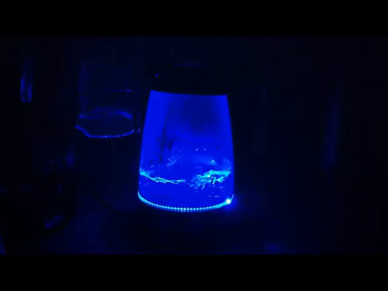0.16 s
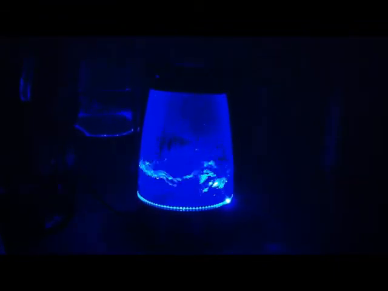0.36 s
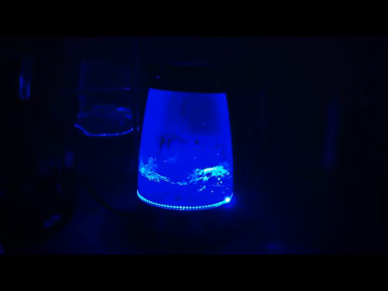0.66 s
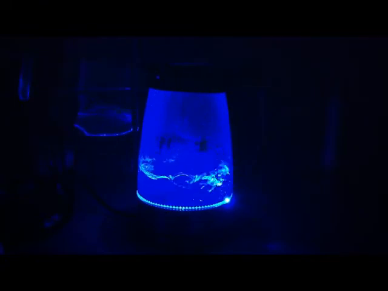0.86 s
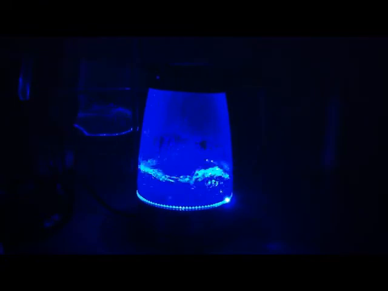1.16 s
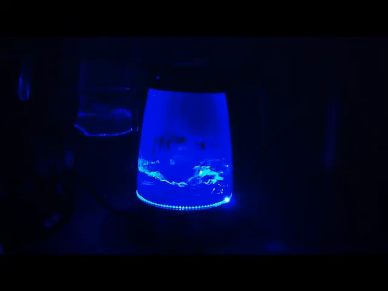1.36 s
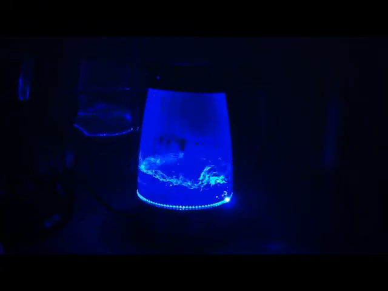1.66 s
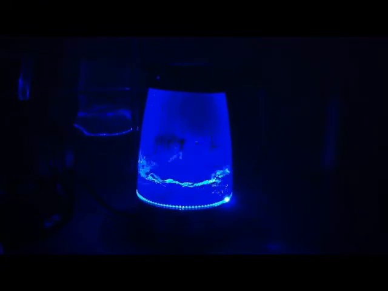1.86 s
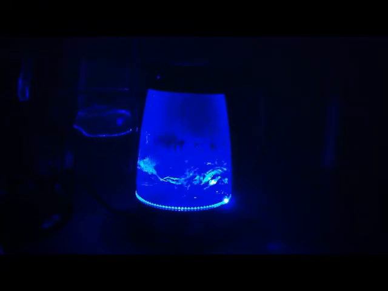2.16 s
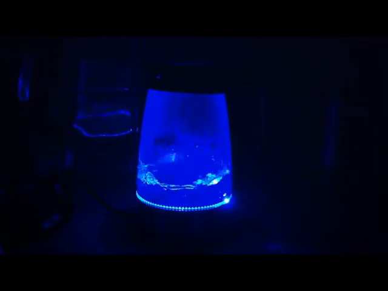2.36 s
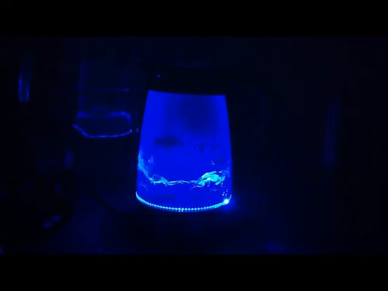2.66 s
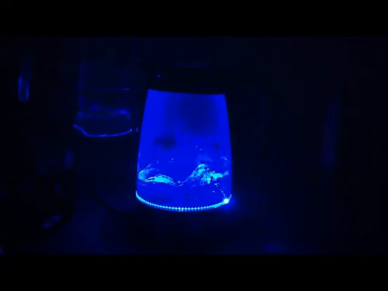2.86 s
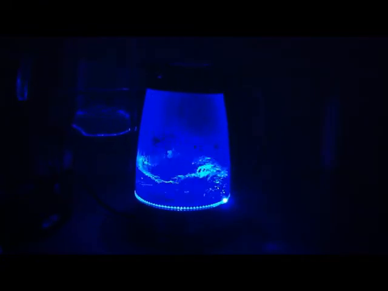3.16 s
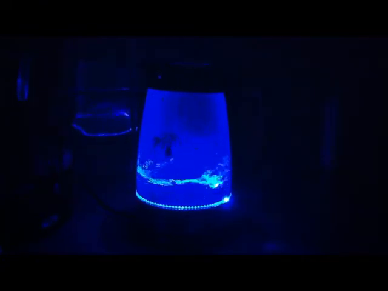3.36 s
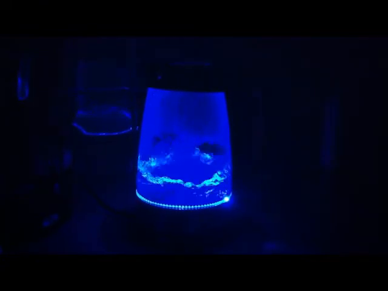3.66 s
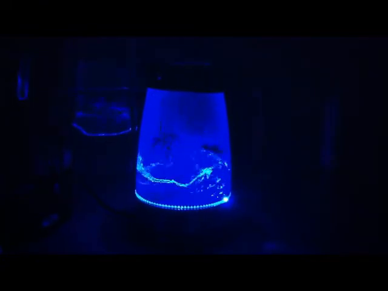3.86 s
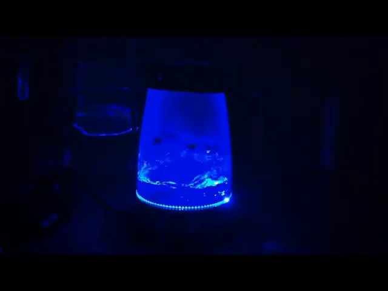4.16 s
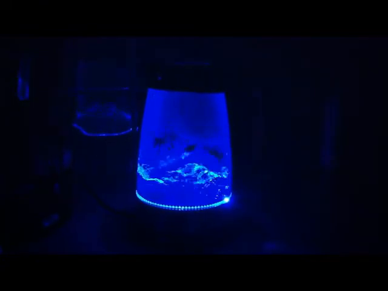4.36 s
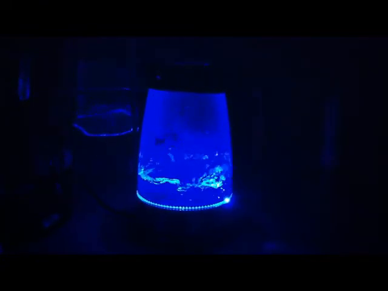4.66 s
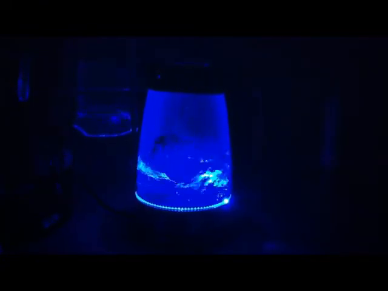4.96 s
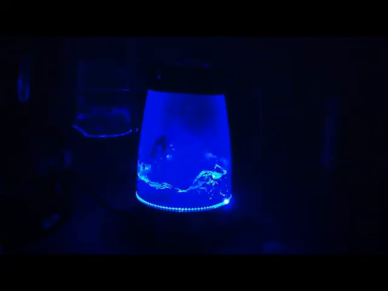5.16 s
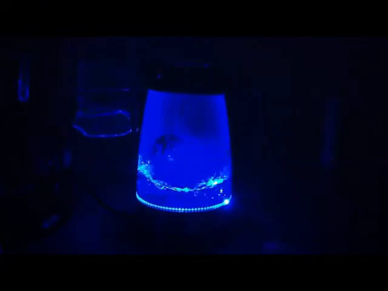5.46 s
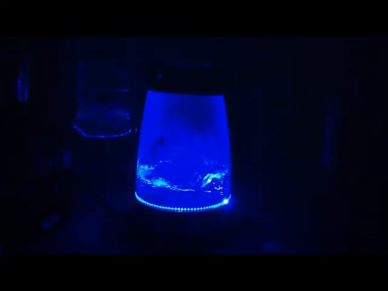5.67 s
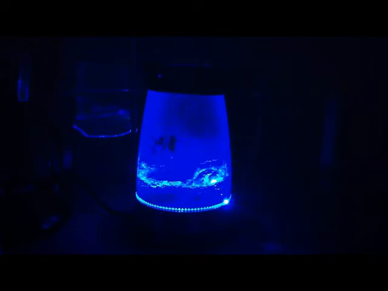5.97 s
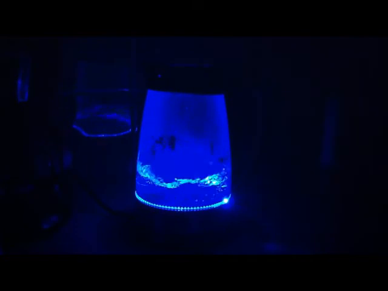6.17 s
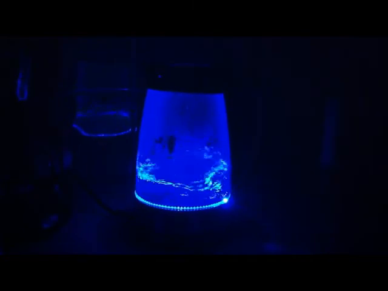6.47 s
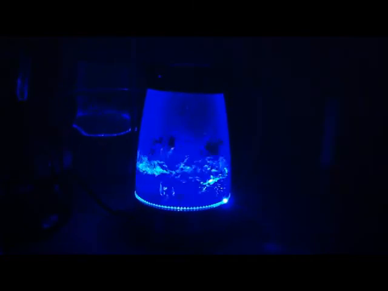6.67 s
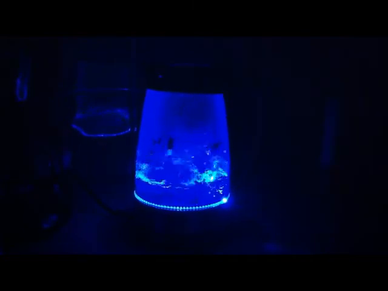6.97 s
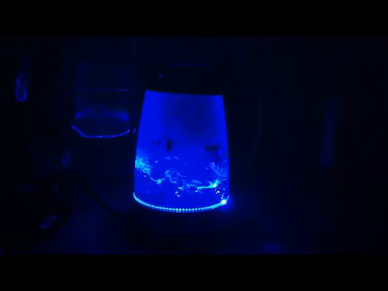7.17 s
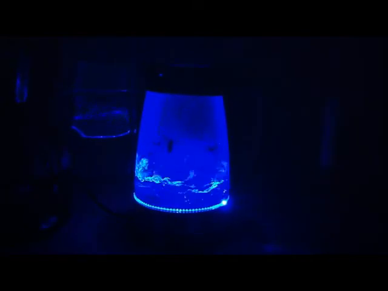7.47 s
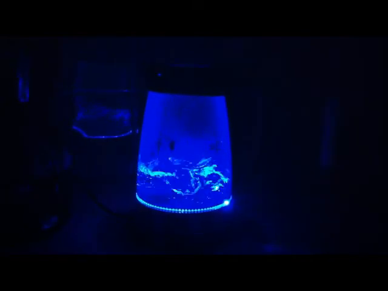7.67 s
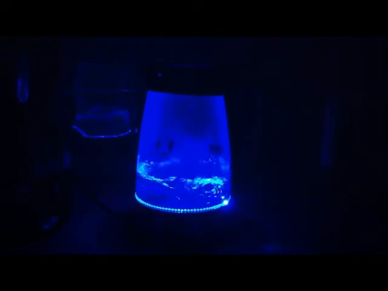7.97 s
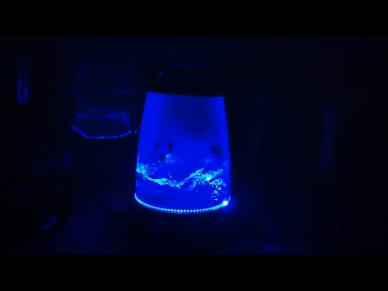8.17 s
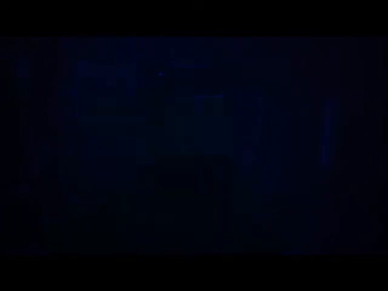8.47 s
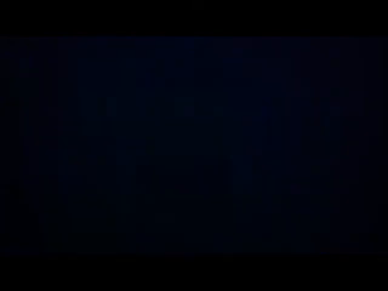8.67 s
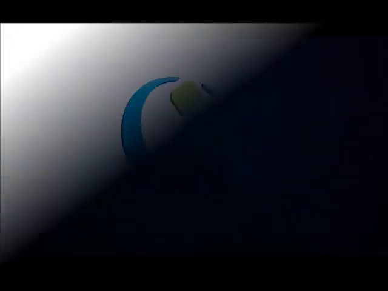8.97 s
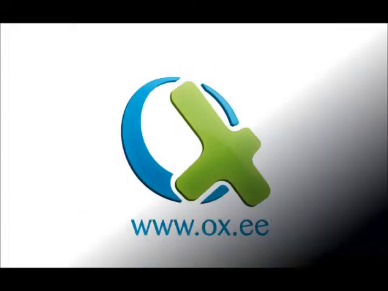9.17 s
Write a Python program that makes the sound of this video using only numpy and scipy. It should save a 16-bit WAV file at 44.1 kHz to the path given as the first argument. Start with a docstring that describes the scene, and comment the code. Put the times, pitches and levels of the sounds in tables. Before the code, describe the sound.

A glass electric kettle is already at a rolling boil, heard close with one microphone in a small hard kitchen with a short room tail. From 0 s a low drone around 200 Hz thumps and wavers in the base, swelling and dropping out irregularly. Above it runs a dense, wet gurgle with hollow ringing from the air over the water, and a light bright hiss of spray. Short rounded bubble plops, many around one pitch, and noisy little splats on the glass poke out at random, growing busier from about 2.5 to 5 s. From roughly 4.7 s the whole scene fades steadily, though the boiling stays lively. At about 8.5 s the switch lets go: a sharp, hard plastic snap with quick bounces and a brief hollow rattle, clearly louder than the faded water. Faint bubbling lingers and sinks to near silence by 9.3 s.

```python
"""A low drone of steam thumping the base of a glass electric kettle, then gurgle and hiss above it.
Place: a small hard kitchen; distance: close to the jug; one microphone.
Random clicks ring the base and the air above the water; glides and noise make bubbles and spray.
Single drops and bubbles stand out; the switch snaps off as bursts of noise and decaying tones,
late in a long fade-out. Sparse decaying taps give the room."""
import sys
import numpy as np
from scipy import signal
from scipy.fft import rfft, irfft, next_fast_len
from scipy.io import wavfile
from scipy.ndimage import uniform_filter1d

SR = 44100
rng = np.random.default_rng(int(sys.argv[2]) if len(sys.argv) > 2 else 0)


def store_pcm(level_fs):
    """Save levels as 16-bit WAV."""
    pcm = np.round(np.clip(level_fs, -1, 1) * 32767).astype(np.int16)
    wavfile.write(sys.argv[1], SR, np.atleast_2d(pcm).T)


N = 411453


def gain_of(db):
    """Decibels to an amplitude factor."""
    return 10 ** (np.asarray(db) / 20)


def evened(x):
    """Scales to rms 1."""
    return x / np.sqrt(np.mean(x ** 2) + 1e-20)


def read(points, hz):
    """Looks up a table on a log-frequency axis."""
    f, value = np.transpose(points)
    return np.interp(np.log(hz + 1), np.log(f + 1), value)


def level_over_time(points):
    """Joins (time [s], level [dB]) points by straight lines, one dB value per sample."""
    return np.interp(np.arange(N) / SR, *np.transpose(points))


def add(mix, s, sound):
    """Mixes a sound in at s seconds."""
    part = mix[round(s * SR):][:len(sound)]
    part += sound[:len(part)]


def coloured(x, points):
    """Filters x by a table of (frequency [Hz], gain [dB])."""
    n = next_fast_len(len(x), True)
    gain = gain_of(read(points, np.fft.rfftfreq(n, 1 / SR)))
    return irfft(rfft(x, n) * gain, n)[:len(x)]


def resonate(x, modes):
    """Sum of resonances, neighbours in opposite phase."""
    out = 0
    for k, (hz, width, db) in enumerate(modes):
        out = out + (-1) ** k * gain_of(db) * signal.lfilter(*signal.iirpeak(hz, hz / width, SR), x)
    return out


def scattered(per_s, spread_db):
    """Random clicks of either sign, most small, a few large."""
    place, size, sign = rng.random((8000, 3))[:int(per_s * N / SR)].T
    out = np.zeros(N)
    size_db = spread_db * np.minimum(-np.log(size), 3.5)
    out[(place * N).astype(int)] = gain_of(size_db) * np.sign(sign - .5)
    return out


def surging(per_s, depth_db):
    """Random level that wanders about per_s times a second."""
    knots = rng.standard_normal(1000)
    return gain_of(depth_db * np.interp(np.arange(N) / SR * per_s, np.arange(1000), knots))


def bubble(hz, cycles, glide):
    """A short tone that swells, glides in pitch and dies, as a bubble closes."""
    u = np.arange(0, 1, hz / (2 * cycles * SR))  # share of its life
    phase = 2 * np.pi * 2 * cycles * (u + glide * (u ** 2 - u) / 2)
    return np.sin(phase) * 5 * u * np.exp(1 - 5 * u) * (1 - u)


# strongest mode of the base: (frequency [Hz], width [Hz], level [dB])
HUM_MODE = [(201.7, 16.2, 0)]
# weaker modes of jug, base and counter: (frequency [Hz], width [Hz], level [dB])
BASE_MODES = [(120.2, 24, -12.5), (158.5, 15.4, -1), (246.2, 12.4, -7), (274.9, 13.8, -4),
              (293.4, 19.3, -4)]


def thumping(modes, evenness):
    """Steam pockets collapse on the plate in quick succession and ring the base."""
    rung = resonate(scattered(per_s=600, spread_db=2.5), modes)
    if len(modes) == 1:  # a lone mode has steep skirts
        hz, width, _ = modes[0]
        rung = resonate(rung, [(hz, 2.1 * width, 0)])
    rung = signal.sosfilt(signal.butter(6, [112, 308], "band", fs=SR, output="sos"), rung)
    power = abs(uniform_filter1d(rung ** 2, size=SR // 15))
    # the drone stays near its running mean level
    return evened(rung / (power + 0.051 * power.mean()) ** (evenness / 2))


# swells and drop-outs of the base hum: (time [s], level [dB] added to the thumping)
HUM_SWELLS = [(0.07, 4), (0.19, 3), (0.27, -7), (0.45, 4.5), (0.61, -2), (1.03, 1.5), (1.34, 4), (1.5, 7),
              (1.68, 3.5), (1.95, 4), (2.21, 0), (2.27, 4.5), (2.56, 6), (2.76, 9), (2.85, -18), (3.02, 4),
              (3.1, 9), (3.43, 2.5), (3.86, 12.5), (3.99, -7), (4.08, 7), (4.21, 3.5), (4.78, 2), (4.85, 6),
              (4.94, 5.5), (5.08, 7.5), (5.42, -1), (5.52, 8.5), (5.73, 6.5), (6.08, 9.5), (6.19, 8),
              (6.4, 10.5), (6.74, 9), (6.81, -7), (6.96, -5), (7.03, -1), (7.32, 8), (7.41, 11.5),
              (7.48, -14), (7.63, -1), (7.71, 4), (7.82, 4.5), (7.93, 3), (8.12, 3), (8.41, 9.5),
              (8.49, 10), (8.62, -3), (8.71, -4), (8.9, 1), (8.96, 7.5), (9.27, -7)]
# thumping at the heating plate, easing off late in the boil: (time [s], level [dB])
THUMP_LEVEL = [(0.0, -43), (1.0, -45.5), (4.0, -45.5), (6.5, -47.5), (7.2, -47.5), (8.7, -48.5),
               (9.33, -46.5)]
SWELL_S = 0.028  # time from the centre of a swell to 1/e of its dB


def swelling(share):
    """Level of the thumping, with a share of the short bell-shaped swells and drop-outs, in dB."""
    t = np.arange(0, N, 100) / SR  # coarse grid, interpolated below
    swell_db = sum(db * np.exp(-((t - s) / SWELL_S) ** 2) for s, db in HUM_SWELLS)
    level_db = share * swell_db + np.interp(t, *np.transpose(THUMP_LEVEL))
    return gain_of(np.interp(np.arange(N) / SR, t, level_db))


# wash of small bubbles: (frequency [Hz], colour [dB per Hz])
GURGLE_COLOUR = [(250, -65), (340, -3), (480, -6), (650, -8), (900, -12), (1350, -10), (2400, -15.5),
                 (3000, -22), (4500, -26), (8000, -40)]
GURGLE_DB = -53  # steady level of the rolling boil


def gurgle(surge):
    """Dense bubbles of every size over a wash of smaller ones."""
    bubbles = np.zeros(N)
    for hz in np.geomspace(320, 4000, num=20):
        bubbles += signal.oaconvolve(scattered(per_s=48, spread_db=3.5), bubble(hz, 11.9, 0.21))[:N]
    bubbles = evened(coloured(bubbles, [(300, -13.0), (4000, 4.5)]))
    water = (rng.standard_normal(N) + gain_of(-9.5) * bubbles) * surge
    return evened(coloured(water, GURGLE_COLOUR))


# bursting films and drops: (frequency [Hz], colour [dB per Hz])
SPRAY_COLOUR = [(1200, -22), (2500, -8.5), (4300, -13.5), (5400, -4), (7400, -6.5), (8400, -7.5),
                (10300, -11), (13800, -7), (15700, -8.5)]
# glass wall under the spray: (frequency [Hz], width [Hz], level [dB over the spray])
GLASS_WALL = [(5200, 200, -0.5)]


def spray(surge):
    """Hiss of bursting films, with small drops landing in short noisy ticks, some dull and some bright."""
    t = np.arange(1500) / SR
    drops = rng.standard_normal(N)
    for colour in ([(6000, -1), (11000, -11)], [(6000, -8), (11000, -2)]):  # dull, then bright
        ticks = signal.oaconvolve(abs(scattered(per_s=50, spread_db=1.8)), gain_of(-60 * t / .03))[:N]
        drops = drops + gain_of(-2.0) * coloured(rng.standard_normal(N) * evened(ticks), colour)
    drops = coloured(surge * drops, SPRAY_COLOUR)
    glass = surging(per_s=12, depth_db=3.5) * resonate(drops, GLASS_WALL)
    return evened(drops + glass)


# the spray grows as the boil gets wilder: (time [s], level [dB])
SPRAY_LEVEL = [(0.0, -63), (1.3, -62), (2.5, -62), (4.3, -60), (5.5, -61.5), (7.0, -60), (8.0, -59.5),
               (9.33, -59)]


def spray_growth():
    """Level of the spray along the boil."""
    return gain_of(level_over_time(SPRAY_LEVEL))


# air above the water: (frequency [Hz], width of the first pass [Hz], level [dB over the slosh])
AIR_MODES = [(429.4, 23, -2.5), (570.5, 14, -10.5), (624.6, 39, -5), (805.6, 19, -10), (1044, 52, -4),
             (1125, 32, -6), (1635, 48, -4), (2087, 300, -5), (2170, 110, -8)]
SLOSH_DB = -61.5  # steady level that the air modes are set against


def cavity():
    """Small slaps knock each air mode in turn, over a flickering noisy slosh; two passes keep it narrow."""
    out = np.zeros(N)
    for hz, width, db in AIR_MODES:
        slaps = evened(scattered(per_s=60, spread_db=4.5))
        drive = rng.standard_normal(N) + gain_of(-3.5) * slaps
        once = resonate(surging(per_s=36, depth_db=3.5) * drive, [(hz, width, 0)])
        out += gain_of(db) * evened(resonate(once, [(hz, 2 * width, 0)]))
    return out


def chirrups():
    """Small bubbles whose tone falls near the strong air modes stand out as short blips."""
    out = np.zeros(N)
    for hz in [1049, 1122, 1326, 1623, 1664, 1720, 2060, 2200]:
        blip = bubble(hz, 12.6, 0.094 * rng.standard_normal())
        out += signal.oaconvolve(scattered(per_s=14.0, spread_db=1.0), blip)[:N]
    return evened(out)


def low_rumble():
    """Faint low noise of wandering level, strongest near 96 Hz."""
    colour = [(20, -33), (60, -19.0), (76, -26), (96, -2), (125, -50)]
    noise = evened(coloured(rng.standard_normal(N), colour))
    return gain_of(-75.0) * surging(per_s=3.66, depth_db=3.5) * noise


# decay of the small hard kitchen: (frequency [Hz], time to fall 60 dB [s])
KITCHEN_DECAY = [(200, 1), (700, 0.36), (1500, 0.46), (3000, 0.45), (6000, 0.27), (14000, 0.22)]


def kitchen(x):
    """Room reflections as sparse taps of random sign, each band dying at its own speed."""
    taps = np.zeros(SR)
    at = np.arange(300, SR - 20, 20)
    taps[at + rng.integers(0, 20, len(at))] = rng.choice([-1., 1.], len(at))
    hz, t, z = signal.stft(taps, SR, nperseg=256)
    decay = gain_of(-60 * t / read(KITCHEN_DECAY, hz)[:, None])
    tail = signal.istft(z * decay, SR, nperseg=256)[1]
    return signal.fftconvolve(x, tail / np.linalg.norm(tail))[:N]


# drops thrown against the glass, before the fade: (time [s], level [dB], tilt [dB per octave])
GLASS_DROPS = [(0.167, -38, -9), (0.221, -59, -5), (0.297, -35.5, -4.5), (0.477, -38, -7),
               (0.6867, -33.5, -5), (0.832, -39, 1), (0.9383, -41, -7), (0.9638, -38, -1),
               (1.186, -37.5, -5), (1.7444, -38, 8), (2.3084, -38.5, -7), (2.5905, -39, -2),
               (2.772, -36, -12), (2.85, -34, -7), (2.8886, -32.5, 0.0), (3.0706, -35.5, -4),
               (3.4494, -35.5, -4), (3.5154, -42, -2), (3.618, -33.5, -7.5), (3.7219, -37.5, -3),
               (3.8664, -35, -4), (3.9325, -34, -12), (3.993, -41, -1), (4.024, -36, -1), (4.088, -35, -12),
               (4.15, -32, -4), (4.3233, -31, -4), (4.428, -38, -5), (4.537, -35, -4), (4.7375, -37, 4),
               (4.786, -32.5, -6), (4.8663, -37, 2), (5.03, -35.5, 0), (5.0789, -38, 9), (5.206, -37, -4),
               (5.541, -35, 5), (5.7748, -39, 4), (5.9852, -33, -4), (6.4854, -34.5, -6), (6.5525, -40, 10),
               (6.575, -35.5, -3), (6.6274, -36, 2), (6.9194, -34, -6.5), (7.663, -38.5, 2),
               (7.862, -32.5, -4), (7.904, -37, -2), (7.917, -35, -4), (7.961, -34.5, -3.5),
               (8.017, -36, -2), (8.08, -36, -8), (8.13, -36, -5), (8.319, -33.5, -8), (8.399, -35, -8),
               (8.757, -29.5, -9), (8.9965, -37, 4)]


def splats():
    """Each drop is a burst of noise with the colour of the spray, tilted about 6 kHz."""
    out, t, hz = np.zeros(N), np.arange(2048) / SR, np.array([1000, 16000])
    envelope = gain_of(-60 * t / 0.021) * (1 - np.exp(-t / 0.0057))
    noises = rng.standard_normal((len(GLASS_DROPS), 2048))
    for (s, db, tilt_db), noise in zip(GLASS_DROPS, noises):
        tilt = np.c_[hz, tilt_db * np.log2(hz / 6000)]
        noise = evened(coloured(coloured(noise, SPRAY_COLOUR), tilt))
        add(out, s - .001, gain_of(db) * envelope * noise)
    return out


# large bubbles closing, before the fade:
# (time [s], level [dB], frequency [Hz], length [cycles], slap level [dB over the tone])
LARGE_BUBBLES = [(0.209, -47, 1080, 9.2, -17), (0.250, -54, 2100, 12, -10), (0.263, -49, 1080, 8.5, -14),
                 (0.366, -46, 1610, 14, -17), (0.5026, -39.5, 1590, 9.1, -19), (0.5317, -46, 1640, 13, -16),
                 (0.5507, -46, 1580, 12, -12), (0.702, -46, 1630, 13, -10), (0.734, -48, 1080, 10, -16),
                 (0.837, -41, 1640, 23, -16), (1.086, -45, 1590, 13, -10), (1.199, -46, 1630, 14, -2),
                 (1.2995, -44.5, 1590, 35, -18), (1.324, -43.5, 1604, 19, -14), (1.341, -44, 1610, 11, -3),
                 (1.419, -45, 1634, 20, -20), (1.4576, -44.5, 1600, 12, 10), (1.465, -50, 2280, 14, 6),
                 (1.563, -34, 1620, 10.4, -6), (1.754, -48, 2100, 12, -12), (1.998, -54, 1080, 10, -14),
                 (2.004, -45, 1630, 16, -18), (2.0393, -48, 1020, 9.3, -13), (2.0834, -51, 2980, 12, -13),
                 (2.106, -45.5, 1690, 15, 5), (2.353, -45.5, 1650, 28, -19), (2.452, -57, 1310, 10, -14),
                 (2.599, -37.5, 1634, 13, -4), (2.634, -44, 1615, 18, -14), (2.645, -44, 1075, 15, -14),
                 (2.865, -46, 1080, 12, -14), (2.896, -42, 1630, 24, -5), (2.9063, -44, 1630, 20, -1),
                 (2.985, -48, 1600, 18, -16), (2.9067, -47, 3000, 20, 8), (3.106, -47, 1620, 16, -19),
                 (3.127, -48, 1070, 11, 8), (3.129, -48, 1620, 12, -14), (3.3278, -44, 1570, 17, -7),
                 (3.342, -52.5, 2980, 19, 12), (3.634, -46, 1630, 24, -12), (3.642, -46, 2590, 12, -4),
                 (3.6593, -42, 1664, 26, -12), (3.679, -47, 1670, 24, -16), (3.714, -45.5, 1644, 20, -12),
                 (3.8389, -45, 1660, 10.0, 5), (3.8686, -42.5, 2060, 14, -2), (4.279, -42.5, 1664, 15, -7),
                 (4.3241, -44.5, 2160, 16, -14), (4.631, -48.5, 2590, 12, 6), (4.663, -45, 2100, 14, -12),
                 (4.708, -47, 1070, 11, -14), (4.7901, -45, 1610, 17, 5), (4.802, -36, 2050, 11, 0),
                 (4.803, -46, 3020, 12, -9), (4.819, -35.5, 1620, 11, -3.5), (5.0311, -43, 1080, 6.5, -4),
                 (5.032, -43, 1750, 7.2, -8), (5.074, -51, 1670, 12, -15), (5.086, -40, 1660, 14, -2),
                 (5.154, -40.5, 1590, 7.5, -6), (5.211, -39.5, 1640, 14, -7), (5.511, -41.5, 1620, 17, -22),
                 (5.569, -36, 1650, 13, -3.5), (5.7129, -46, 2200, 13, 5), (5.878, -47, 1660, 17, -10),
                 (5.966, -43, 1610, 13, -10), (6.0338, -40, 1670, 16, -16), (6.084, -39, 1630, 10, 1.5),
                 (6.349, -41.5, 1685, 14, 2), (6.558, -44, 1664, 16, -20), (6.697, -46, 1080, 9.3, -14),
                 (6.74, -38, 1650, 8.9, -10), (6.874, -40.5, 1620, 13, -5), (6.94, -41.5, 1640, 18, -18),
                 (6.982, -46, 1670, 18, -14), (7.079, -37, 1660, 13, -15), (7.222, -45, 1350, 10, -12),
                 (7.2458, -41.5, 1634, 15, 0), (7.341, -45, 1620, 19, -14), (7.372, -43, 1630, 12, -14),
                 (7.599, -44, 1640, 13, -14), (7.604, -47, 1070, 10, -14), (7.756, -48, 1640, 14, -16),
                 (8.022, -40.5, 1630, 12, -9), (8.169, -44, 1680, 13, -16), (8.709, -46, 1620, 14, -14),
                 (8.808, -45, 1330, 10, -14)]


def plops():
    """Each bubble tone bends up or down a little, with a slap of water in a brightened gurgle colour."""
    out, t = np.zeros(N), np.arange(1024) / SR
    envelope = gain_of(-60 * t / 0.044) * (1 - np.exp(-t / 0.0046))
    brighter = [(300, -14), (2400, -6.0), (3800, -12)]
    noises = rng.standard_normal((len(LARGE_BUBBLES), 1024))
    for (s, db, hz, cycles, slap_db), noise in zip(LARGE_BUBBLES, noises):
        glide = 0.01 + 0.041 * noise[0]
        add(out, s - .0015, gain_of(db) * bubble(hz, max(cycles, 2), glide))
        slap = evened(coloured(coloured(noise, GURGLE_COLOUR), brighter))
        add(out, s - .002, gain_of(db + slap_db) * envelope * slap)
    return out


# the switch lever lets go, lands and bounces, before the fade: (time [s], level [dB])
LEVER_CONTACTS = [(8.5262, -26), (8.5283, -10), (8.5312, -11), (8.5345, -15), (8.5412, -15), (8.5475, -18),
                  (8.572, -26)]
# colour of the rattle: (frequency [Hz], colour [dB per Hz])
RATTLE_COLOUR = [(60, -20), (420, -6.5), (800, 5.5), (1000, -5.5), (1330, 2.5), (1700, 1), (2550, 0.5),
                 (3000, -5.5), (3700, -11), (5300, -7), (9500, -19), (11300, -16), (15500, -15)]
# plastic handle and shell: (frequency [Hz], time to fall 60 dB [s], level [dB over the contact])
SHELL_MODES = [(450, 0.041, -30), (635, 0.06, -20), (810, 0.05, -18), (1330, 0.036, -15),
               (1550, 0.038, -13), (1690, 0.04, -21), (2090, 0.035, -17), (2570, 0.025, -26.5),
               (3250, 0.023, -25)]
# hollow of the base, rattling on after the snap: (frequency [Hz], width per pass [Hz], level [dB])
BASE_HOLLOW = [(790, 96, -26.5)]
RATTLE_DB = -1  # noisy part against each contact, before its colour


def switch():
    """Every contact of the lever rings the shell and rattles briefly; the base knocks after it."""
    rattle, rung, t = np.zeros(N), np.zeros(N), np.arange(12000) / SR
    ring = np.zeros(len(t))
    for k, (hz, t60, db) in enumerate(SHELL_MODES):
        ring += (-1) ** k * gain_of(db - 60 * t / t60) * np.sin(2 * np.pi * hz * t)
    ring = ring * (1 - np.exp(-t / 0.0012))  # soft onset
    noises = rng.choice([-1., 1.], (len(LEVER_CONTACTS), 12000))
    for (s, db), noise in zip(LEVER_CONTACTS, noises):
        add(rattle, s, gain_of(db + RATTLE_DB - 60 * t / 0.036) * noise)
        add(rung, s, gain_of(db) * noise[0] * ring)  # random sign
    snap = coloured(rattle, RATTLE_COLOUR) + rung
    (hz, width, db), = BASE_HOLLOW
    mode = [(hz, width, 0)]
    hollow = evened(resonate(resonate(rng.standard_normal(12000), mode), mode))
    envelope = gain_of(db - 60 * t / 0.22) * (1 - np.exp(-t / 0.021))
    add(snap, LEVER_CONTACTS[4][0], hollow * envelope)  # from the fifth contact
    return snap


def scene():
    """The boil, its single bubbles and drops, a faint low rumble and the switch, in the kitchen."""
    surge = surging(per_s=20, depth_db=1.5)  # waves of the boil lift gurgle and spray together
    hum = swelling(1.0) * thumping(HUM_MODE, evenness=0.99)
    # weaker modes: 2.5 dB lower, following 0.13 of each swell in dB
    base = gain_of(-2.5) * swelling(0.13) * surging(per_s=8, depth_db=2.0)
    base = base * thumping(BASE_MODES, evenness=0.23)
    boil = hum + base + gain_of(GURGLE_DB) * gurgle(surge) + spray_growth() * spray(surge)
    ringing = gain_of(SLOSH_DB) * (cavity() + gain_of(-3.0) * chirrups())
    drops, tones, snap = splats(), plops(), switch()
    # how strongly each source excites the room
    to_room = gain_of(-14.5) * (boil + ringing) + gain_of(-8.5) * tones
    to_room = to_room + gain_of(-3.0) * drops + gain_of(-8.5) * snap
    close = boil + ringing + low_rumble() + tones + drops + snap
    return (close + kitchen(to_room))[None]


FADE_FROM_S, FADE_TO_S = 4.67, 9.38  # the fader closes evenly; the file ends just short of silence
EDGE_HZ = 15750  # upper band limit


def record(dry):
    """A straight-line fade toward silence, then the band limit."""
    fade = np.clip((FADE_TO_S - np.arange(N) / SR) / (FADE_TO_S - FADE_FROM_S), 0, 1)
    band_limit = signal.firwin(511, EDGE_HZ, window=("kaiser", 9), fs=SR)
    return signal.oaconvolve(dry * fade, band_limit[None], "same")


dry = scene()
out = record(dry)
store_pcm(out)
```